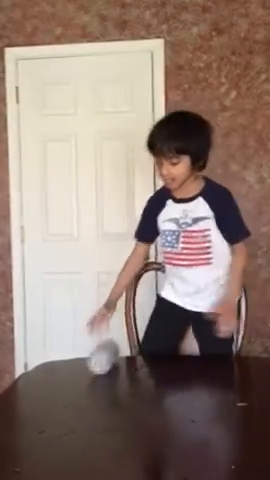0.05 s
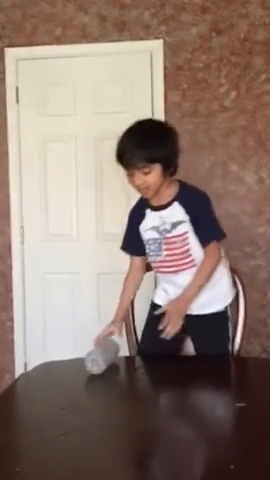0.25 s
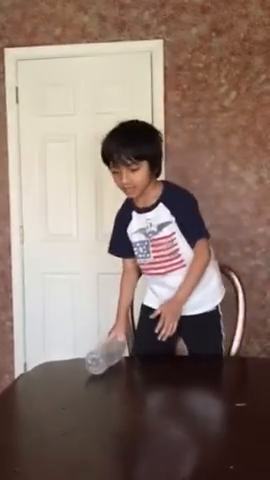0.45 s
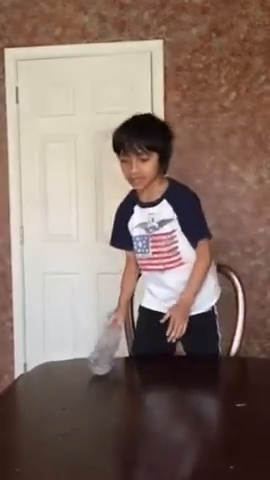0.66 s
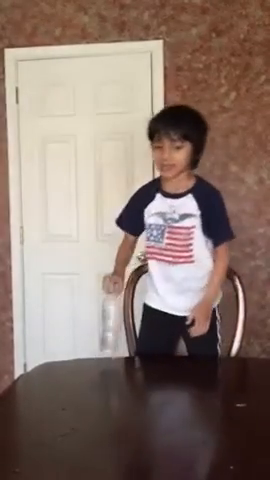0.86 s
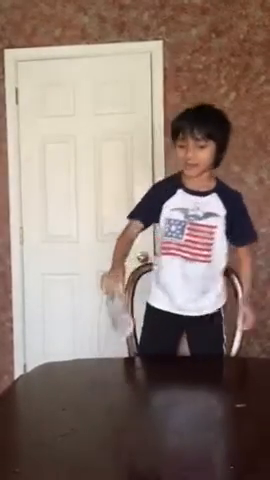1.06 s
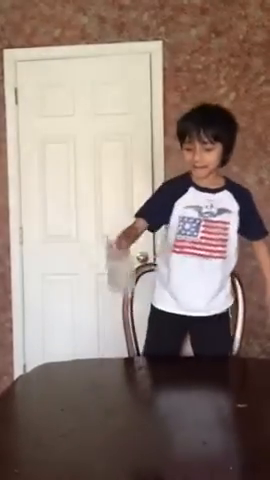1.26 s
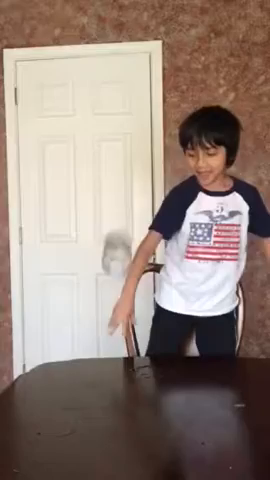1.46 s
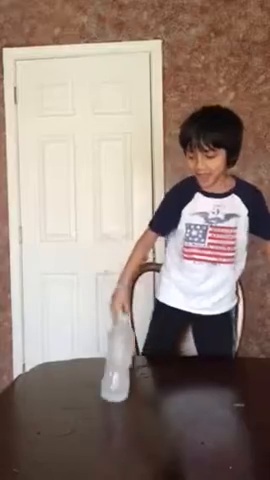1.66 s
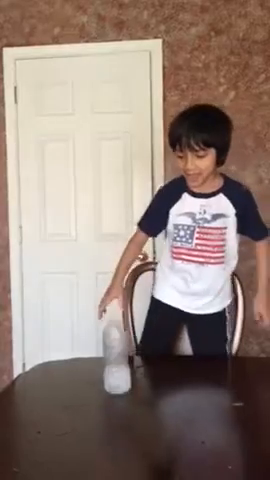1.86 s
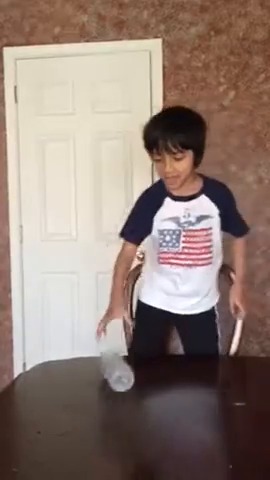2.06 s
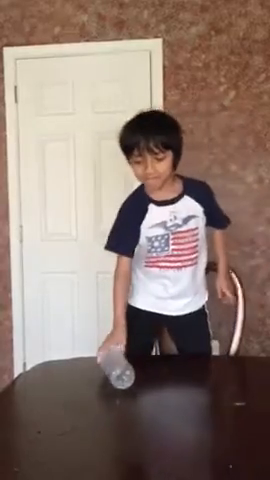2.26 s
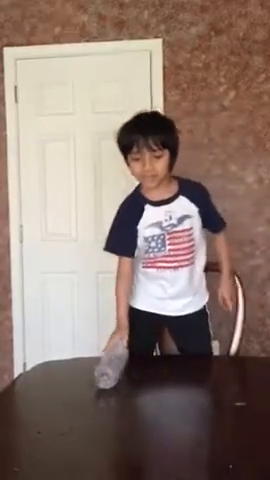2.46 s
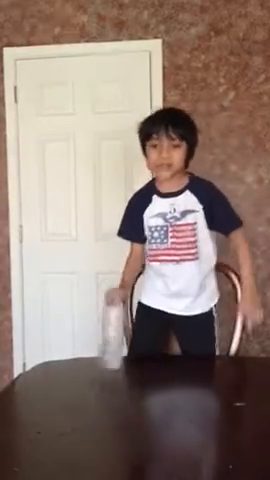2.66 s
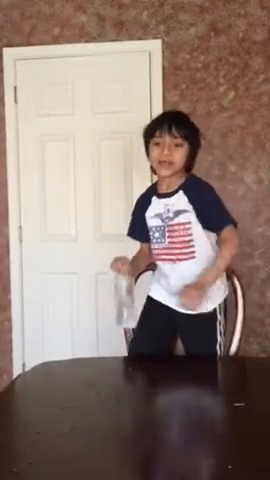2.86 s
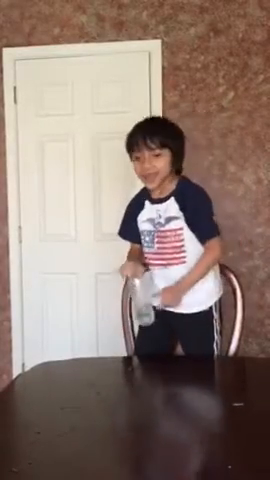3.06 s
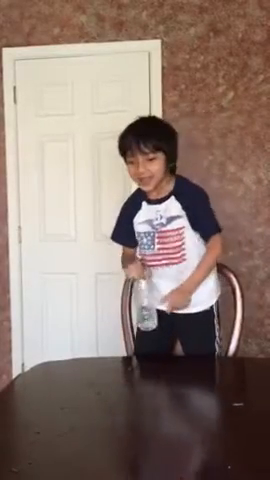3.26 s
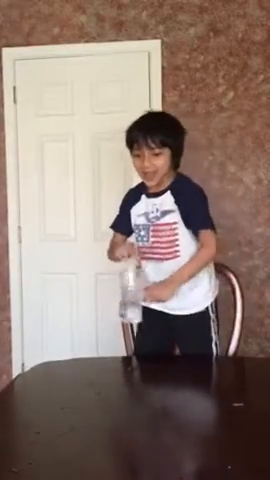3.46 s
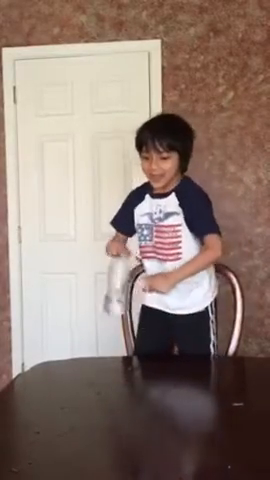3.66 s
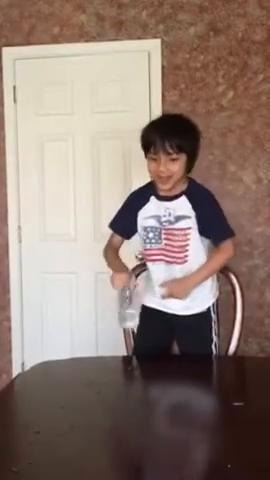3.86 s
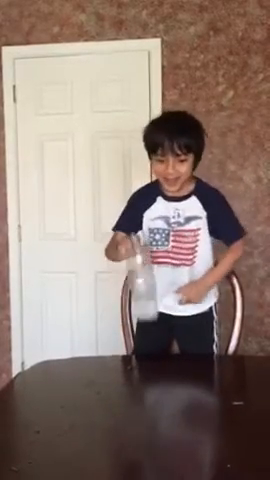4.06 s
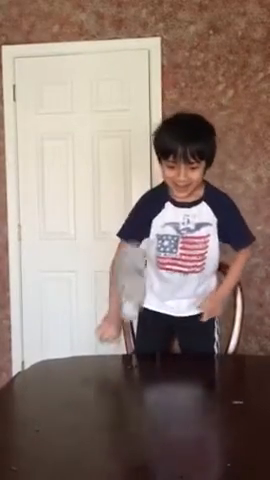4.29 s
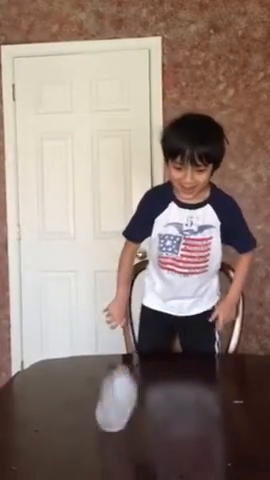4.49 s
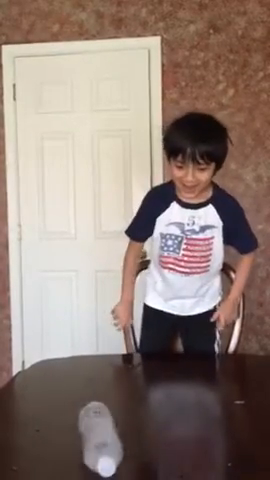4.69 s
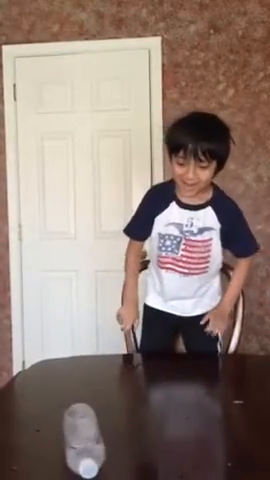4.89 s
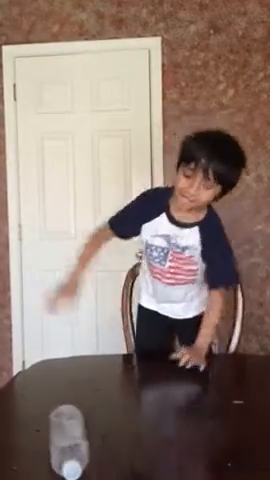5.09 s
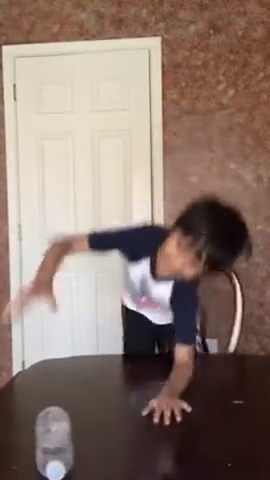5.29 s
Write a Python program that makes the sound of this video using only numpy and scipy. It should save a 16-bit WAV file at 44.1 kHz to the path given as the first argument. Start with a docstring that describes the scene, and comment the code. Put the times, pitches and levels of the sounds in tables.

```python
"""A part-filled plastic water bottle is flipped onto a wooden table in a live, humming room.
Each landing clacks the thin shell (damped noise bursts), sets table top, bottle air and shell ringing
(decaying modes) and drives the water against the wall (a short pulse); the bottle bounces or topples over.
Between landings the shell pops and the water slaps (modes) and sloshes (crowded bubbles), the plastic rubs
(tiny slips) and feet shift on the floor (modes), over ventilation rumble (filtered noise) and hum (sines)."""
import sys
import numpy as np
from scipy import signal
from scipy.fft import rfft, irfft
from scipy.io import wavfile
from scipy.ndimage import uniform_filter1d

SR = 44100
rng = np.random.default_rng(int(sys.argv[2]) if len(sys.argv) > 2 else 0)


def digitize_waveform(pressure):
    """Quantize a signal to 16-bit integers and store it at the path in sys.argv[1].

    Rows of a 2-D input are taken as channels; values are limited to [-1, 1].
    """
    field = np.atleast_2d(pressure).T
    bounded = np.clip(field, -1, 1)
    quanta = np.round(bounded * 32767).astype(np.int16)
    wavfile.write(sys.argv[1], SR, quanta)


N = 235185
T = np.arange(SR // 2) / SR  # time after a blow, in seconds

# Bottle striking the table. Each row: start in seconds, clack level in dB, level in dB of the joint ringing
# of table top, bottle air and shell, snap level in dB, water punch level in dB, punch delay in seconds,
# clack tilt in dB per octave, shell note in Hz, shell note level in dB.
LANDINGS = [(0.0313, -17.5, -29.5, -29, -35, 0.011, 1.06, 1487, -18),
            (0.0627, -30.5, -40, -45, -33, 0.0046, 3.5, 2280, -29),
            (0.0966, -29.5, -62, -35, -32, 0.011, 4.5, 1000, -23),
            (0.178, -40, -37, -73, -58, 0.002, 1, 1300, -54),
            (1.7575, -16.5, -19, -26, -9, 0.0056, 2.5, 2134, -16),
            (2.0502, -24.5, -32.5, -32, -27, 0.00696, 3, 4020, -31.5),
            (4.576, -20.5, -24.5, -34.5, -20, 0.0058, 2.4, 1752, -15),
            (4.66, -24.5, -37.5, -35, -21, 0.0033, -0.3, 843, -19)]
# Spectrum of sharp first contact. Each row: frequency in Hz, relative level in dB.
SNAP = [(500, -24.5), (2500, -2), (4000, 7), (5000, -2), (6500, -1), (8800, -5.5), (10500, -15),
        (12500, -10), (15000, -15), (17000, -24)]


def landings(clack_t60=0.083, snap_t60=0.032, note_t60=0.034, ring_lag=0.001, punch_hz=260,
             punch_width=0.0033, clack_room_db=-3, snap_room_db=-5, ring_room_db=-8):
    """Impact excitation: the shell hits first and sets the modes ringing; the water arrives a moment later."""
    # Spectrum of shell and veneer. Each row: frequency in Hz, relative level in dB before the tilt.
    clack = [(60, -12), (110, -5.5), (300, -8), (480, -1), (700, -1.5), (1000, -1), (1900, -4), (2500, -10),
             (3400, -14), (4600, -28), (8000, -34.5), (16000, -45)]
    # Modes of table top, bottle air and shell, ringing together after a landing.
    # Each row: frequency in Hz, relative level in dB, t60 in seconds.
    landing_modes = [(101, -17.5, 0.24), (116.4, -2, 0.34), (142.6, -5, 0.22), (168, -4, 0.35),
                     (239.7, -9.5, 0.26), (277.4, -3.5, 0.27), (315.7, -5.5, 0.14), (448, -22, 0.39),
                     (733, -14.5, .3), (808, -13, 0.15), (903, -10.5, 0.19), (1120, -24, 0.16),
                     (1372, -15.5, 0.16), (1488, -19, 0.34), (1706, -16.5, 0.32), (1670, -15, 0.11),
                     (1820, -16, 0.11), (1944, -22, .24)]
    out = np.zeros(N)
    for s, clack_db, ring_db, snap_db, punch_db, delay, tilt_db, note_hz, note_db in LANDINGS:
        # a harder spot sounds brighter
        tilted = [(hz, db + tilt_db * np.log2(hz)) for hz, db in clack]
        crack = amp(clack_db) * burst(tilted, clack_t60)
        crack += amp(snap_db) * burst(SNAP, snap_t60)
        crack += ring([(note_hz, note_db, note_t60)])  # the struck spot of shell rings briefly

        # the water stops against the wall in one short push and rebound
        late = T - delay
        push = np.cos(2 * np.pi * punch_hz * late) * np.exp(-(late / punch_width) ** 2)
        body = amp(punch_db) * push
        add(body, ring_lag, amp(ring_db) * ring(landing_modes))

        radiated = amp(clack_db + clack_room_db) * click(tilted)
        radiated += amp(snap_db + snap_room_db) * click(SNAP)
        echoes = room(radiated + amp(ring_room_db) * body)
        add(out, s, crack + body + echoes)
    return out


def pops_and_slaps(tick_t60=0.02, slap_lag=0.003, wall_room_db=-9, tick_room_db=-2):
    """Snap-through and impact: shell modes, pitched by the wall's stiffness, and water modes a moment later."""
    # Shell pops and water slaps, in the hand or in flight. Each row: start in seconds, pop level in dB,
    # treble tick level in dB, water slap level in dB, wall stiffness as a factor on the shell modes' pitch.
    flexes = [(0.8172, -47, -66, -52, 0.6), (0.987, -42.5, -68.5, -58, 0.6), (1.1778, -53, -79, -68, 1.26),
              (1.4002, -19, -44, -34, 1.01), (1.47, -65, -79, -42.5, 0.77), (1.595, -69, -65, -68, 1.5),
              (1.7381, -53, -67, -45.5, 0.64), (2.697, -43.5, -52, -49, 1.4), (2.714, -45, -64, -72, 1.05),
              (2.826, -40, -58, -54, 0.79), (3.059, -54, -84.5, -69.5, 0.73),
              (3.9319, -39.5, -74, -51.5, 0.74), (4.252, -32, -60, -34.5, 1.025),
              (4.369, -64, -63.5, -74, 0.6), (4.4887, -65, -56.5, -59, 0.75), (4.499, -62, -60, -65, 1.6),
              (4.542, -42, -53, -75, 0.64)]
    # Modes of the dented wall. Each row: frequency in Hz before the stiffness factor,
    # relative level in dB, t60 in seconds.
    shell_modes = [(610, -13.5, 0.046), (1290, -9, 0.018), (1610, -6, 0.011), (2030, -11, 0.015),
                   (2460, -13.5, 0.019), (3300, -2, 0.016), (3880, -6, 0.0055), (5300, -13.5, 0.0087)]
    # Water against the wall. Each row: frequency in Hz, relative level in dB, t60 in seconds.
    water_modes = [(164.4, 0, 0.2), (304, 3.5, 0.052), (379, -7, 0.23), (495, -12.5, 0.025)]
    out = np.zeros(N)
    for s, pop_db, tick_db, slap_db, stiffness in flexes:
        wall_modes = [(hz * stiffness, db, t60) for hz, db, t60 in shell_modes]
        wall = amp(pop_db) * ring(wall_modes)
        add(wall, slap_lag, amp(slap_db) * ring(water_modes))
        tick = amp(tick_db) * burst(SNAP, tick_t60)
        radiated = amp(wall_room_db) * wall + amp(tick_db + tick_room_db) * click(SNAP)
        add(out, s, wall + tick + room(radiated))
    return out


def slosh(bubbles_per_s=1000, bubble_t60=0.035, surge_db=4, surges_per_s=50, count=48):
    """Bubble resonance: a crowd of short decaying tones comes in surges, muffled by the bottle wall."""
    # Spectrum through the wall. Each row: frequency in Hz, relative level in dB.
    muffling = [(200, -24), (500, 6), (800, 2.5), (1500, 2), (2500, 1), (4000, -16.5), (7000, -25.5),
                (16000, -36.5)]
    bubbles = np.zeros(N)
    for hz in np.geomspace(450, 5500, count):
        born = rng.random(N) < bubbles_per_s / count / SR
        births = born * (rng.random(N) - 0.5)  # random strength and sign
        bubble = np.sqrt(hz) * ring([(hz, 0, bubble_t60)])
        bubbles += signal.oaconvolve(births, bubble)[:N]
    surging = colour(bubbles, muffling) * lumps(surge_db, surges_per_s)
    return water_motion() * unit(surging)


def water_motion(jolt_db=-31.5, settle_db_per_s=62.5, stir_db=-78.5):
    """Forced motion and decay: the strongest of swings, jolts and a faint steady stirring rules the water."""
    # The bottle is tipped or swung and the water runs to the other end.
    # Each row: start in seconds, length in seconds, level in dB.
    tips = [(0.826, 0.032, -60.5), (0.921, 0.043, -62), (1.32, 0.15, -69.5), (1.763, 0.009, -54.5),
            (2.62, 0.1, -62.5), (2.82, 0.014, -62), (3.934, 0.019, -64.5), (4.393, 0.36, -66),
            (5.046, 0.083, -72)]
    t = np.arange(N) / SR
    # the water gathers speed, then runs out
    swings = [swell(*row, rise_db_per_s=259, fall_db_per_s=150) for row in tips]
    # a landing churns the water, at a level relative to its clack
    jolts = [(t >= s) * swell(s, 0, clack_db + jolt_db, 0, settle_db_per_s)
             for s, clack_db, *_ in LANDINGS]
    return np.maximum(np.max(swings + jolts, axis=0), amp(stir_db))


def rub(grains_per_s=3500, grip_db=5, grips_per_s=70):
    """Stick-slip friction: dense tiny slips of plastic merge into a soft rustle as the grip comes and goes."""
    # Spectrum of the rubbed plastic. Each row: frequency in Hz, relative level in dB.
    rustle = [(300, -25.5), (1500, -13), (3000, 3), (4200, -1.5), (6500, -3), (9000, -9.5), (11000, -18),
              (16000, -18.5)]
    slips = (rng.random(N) < grains_per_s / SR) * rng.standard_normal(N)
    gripped = slips * lumps(grip_db, grips_per_s)
    return sliding() * unit(colour(gripped, rustle))


def sliding(rustle_db=-81.5):
    """Sliding contact: each slide starts and stops above a faint steady rustle."""
    # Plastic slides on the fingers or skids on the table.
    # Each row: start in seconds, length in seconds, level in dB.
    rubs = [(0.176, 0.044, -59.5), (0.899, 0.046, -69.5), (1.38, 0.22, -71.5), (2.263, 0.025, -61),
            (2.504, 0.29, -69.5), (3.061, 0.025, -76), (4.224, .02, -67.5), (4.475, 0.11, -65),
            (4.81, 0.037, -60.5), (4.893, .05, -69.5)]
    slides = [swell(*row, rise_db_per_s=289, fall_db_per_s=221) for row in rubs]
    return np.maximum(np.max(slides, axis=0), amp(rustle_db))


def steps(rise=0.0064):
    """Soft excitation of floor modes: weight settles gently as feet shift."""
    # Soft bumps of shifting feet. Each row: start in seconds, level in dB.
    bumps = [(3.278, -37), (3.734, -43), (3.971, -41)]
    # Modes of the floorboards. Each row: frequency in Hz, relative level in dB, t60 in seconds.
    floor_modes = [(119, 6, 0.13), (162, 0, 0.12), (230.7, -6.5, 0.43)]
    out = np.zeros(N)
    for s, db in bumps:
        soft_onset = 1 - np.exp(-T / rise)
        add(out, s, amp(db) * ring(floor_modes) * soft_onset)
    return out


def background(air_db=-53):
    """Stationary sources: broadband ventilation rumble and the steady tones of mains hum."""
    # Hum of a mains appliance. Each row: frequency in Hz, rms level in dB.
    hum_tones = [(119.7, -54), (240, -58.5)]
    # Spectrum of the ventilation. Each row: frequency in Hz, relative level in dB.
    air = [(22, -27), (38, 4.5), (65, -2.5), (100, 1.5), (145, 3.5), (190, -3), (240, -0.5), (310, -12.5),
           (470, -23), (700, -27), (2000, -41.5), (5000, -44), (10000, -44), (16000, -49.5)]
    t = np.arange(N) / SR
    hum = np.zeros(N)
    for hz, db in hum_tones:
        hum += amp(db) * unit(np.sin(2 * np.pi * (hz * t + rng.random())))  # random phase
    return hum + amp(air_db) * unit(colour(rng.standard_normal(N), air))


def room(x, first_echo=0.0044, build=0.0016, echoes_per_s=4000):
    """Reverberation: scattered wall echoes, drawn afresh for each call, with each band dying at its own speed."""
    # Decay of the echoes. Each row: frequency in Hz, t60 in seconds.
    room_t60 = [(100, 0.55), (260, 0.28), (700, 0.41), (1840, 0.42), (4850, 0.41), (8000, 0.31),
                (14000, 0.12)]
    # Spectrum of the echoes. Each row: frequency in Hz, relative level in dB.
    wall_colour = [(100, 3.5), (400, 1.5), (1500, 0.5), (4000, 2), (8000, -4), (16000, -0.5)]
    taps = np.sign(rng.standard_normal(len(T))) * (rng.random(len(T)) < echoes_per_s / SR)
    hz, t, z = signal.stft(taps, SR, nperseg=256)
    decay = amp(-60 * t / read(room_t60, hz)[:, None])
    tail = signal.istft(z * decay, SR, nperseg=256)[1][:len(T)]
    tail *= 1 - np.exp(-np.maximum(T - first_echo, 0) / build)
    z = rfft(tail)
    # many paths even out the colour
    tail = irfft(z / np.sqrt(uniform_filter1d(abs(z) ** 2, size=330)), len(T))
    tail *= np.minimum(1, 10 * (T[-1] - T)) ** 2  # fades to nothing over the last 0.1 s
    response = colour(tail / np.linalg.norm(tail), wall_colour)
    return signal.fftconvolve(x, response)[:len(x)]


def burst(points, t60, order=240):
    """High modal density: many crowded, well damped modes act as decaying noise; rms 1 over about 10 ms."""
    z = rfft(rng.standard_normal(len(T)) * amp(-60 * T / t60))
    z /= np.sqrt(uniform_filter1d(abs(z) ** 2, order))  # a blow feeds all regions alike
    x = colour(irfft(z, len(T))[:len(T) // 2], points)
    padded = np.pad(x / np.linalg.norm(x), (0, len(T) - len(x)))
    return padded * np.sqrt(SR / 100)


def click(points):
    """Diffuse radiation: a burst's spectrum and energy, evened out over all directions, as the walls get it."""
    x = colour(signal.unit_impulse(len(T)), points)
    return x / np.linalg.norm(x) * np.sqrt(SR / 100)


def ring(modes):
    """Modal superposition: a few clear modes die away; neighbours swing in opposite senses."""
    out = np.zeros(len(T))
    for k, (hz, db, t60) in enumerate(modes):
        out += (-1) ** k * amp(db - 60 * T / t60) * np.sin(2 * np.pi * hz * T)
    return out


def swell(start, length, db, rise_db_per_s, fall_db_per_s):
    """Exponential growth and decay: the gain of one movement rises to its level, holds, and dies away."""
    t = np.arange(N) / SR - start
    rise = rise_db_per_s * np.maximum(-t, 0)
    fall = fall_db_per_s * np.maximum(t - length, 0)
    return amp(db - rise - fall)


def lumps(depth_db, per_s):
    """Random amplitude modulation: swells of gain, about per_s of them a second."""
    knots = np.cumsum(rng.uniform(0.4, 1.6, 2000)) * SR / per_s  # in samples
    heights = np.tanh(rng.standard_normal(len(knots)))
    return amp(depth_db * np.interp(np.arange(N), knots, heights))


def colour(x, points, size=4096):
    """Minimum-phase filtering: a causal filter takes its phase from the given spectrum."""
    log_gain = np.log(amp(read(points, abs(np.fft.fftfreq(size, 1 / SR)))))
    taps = np.fft.ifft(np.exp(np.conj(signal.hilbert(log_gain)))).real
    return signal.fftconvolve(x, taps[:size // 2])[:len(x)]


def read(points, hz):
    """Logarithmic pitch scale: interpolates a table over log frequency."""
    f, value = np.transpose(points)
    return np.interp(np.log(hz + 1), np.log(f + 1), value)


def amp(db):
    """Logarithmic level: decibels to amplitude gain."""
    return 10 ** (np.asarray(db) / 20)


def unit(x):
    """Mean-square normalisation: scales to rms 1."""
    return x / np.sqrt(np.mean(x ** 2) + 1e-20)


def add(mix, s, sound):
    """Linear superposition: mixes a sound in, in place, at time s in seconds."""
    part = mix[max(round(s * SR), 0):][:len(sound)]
    part += sound[:len(part)]


def scene(hand_room_db=-4):
    """Direct and reverberant sum: landings and pops bring their own echoes; the soft sounds share one set."""
    handling = slosh() + rub() + steps()
    echoes = amp(hand_room_db) * room(handling)
    return (landings() + pops_and_slaps() + handling + echoes + background())[None]


def record(dry, low_cut_hz=70, edge_hz=16000):
    """Transducer band limits: a small microphone loses deep bass, then a low-pass filter trims the top."""
    high_pass = signal.butter(1, low_cut_hz, "high", fs=SR, output="sos")
    thin = signal.sosfilt(high_pass, dry)
    low_pass = signal.firwin(511, edge_hz, window=("kaiser", 9), fs=SR)
    return signal.oaconvolve(thin, low_pass[None], "same")


dry = scene()
out = record(dry)
digitize_waveform(out)
```